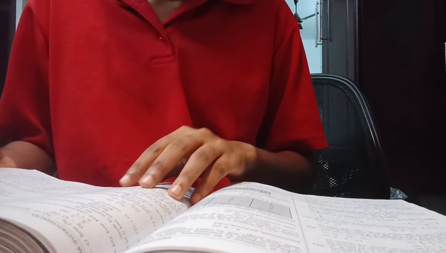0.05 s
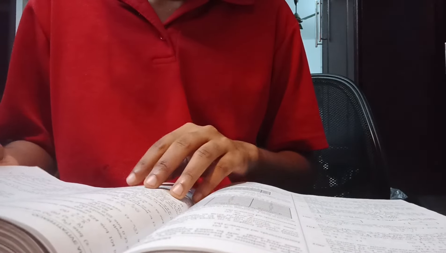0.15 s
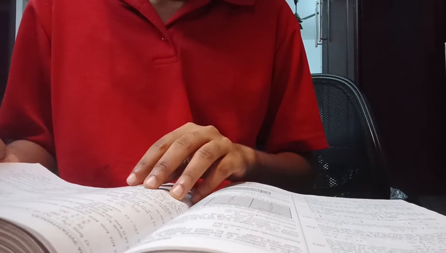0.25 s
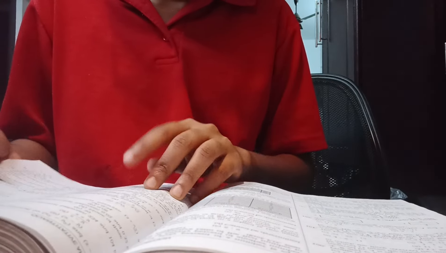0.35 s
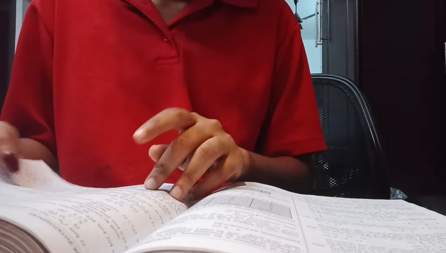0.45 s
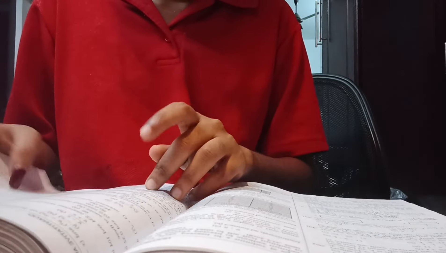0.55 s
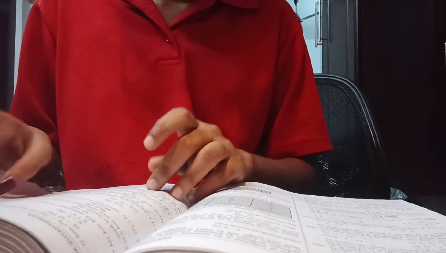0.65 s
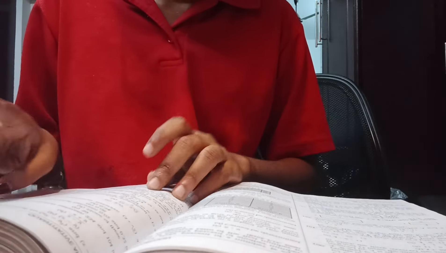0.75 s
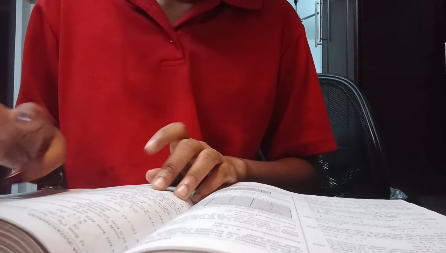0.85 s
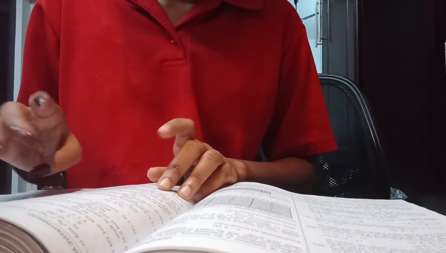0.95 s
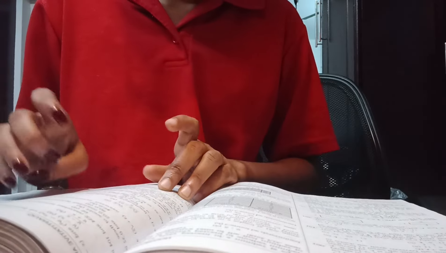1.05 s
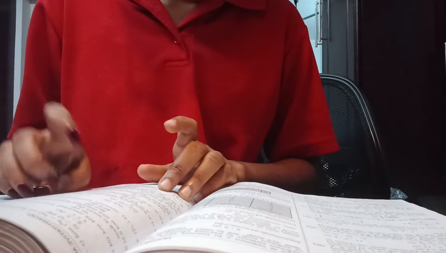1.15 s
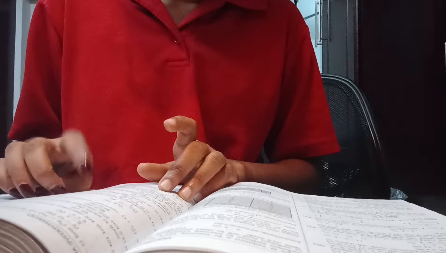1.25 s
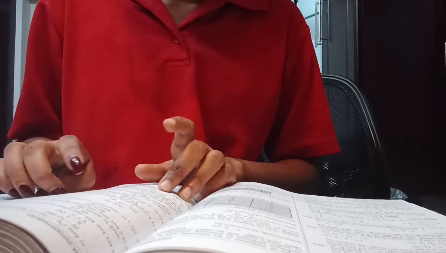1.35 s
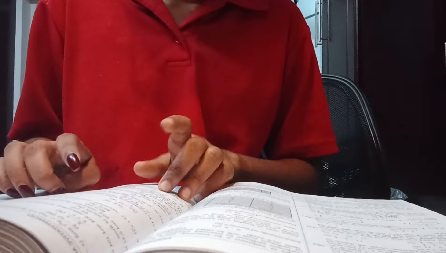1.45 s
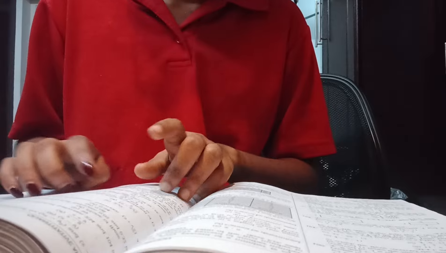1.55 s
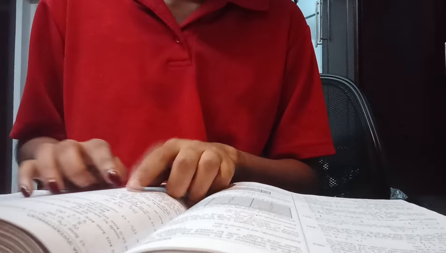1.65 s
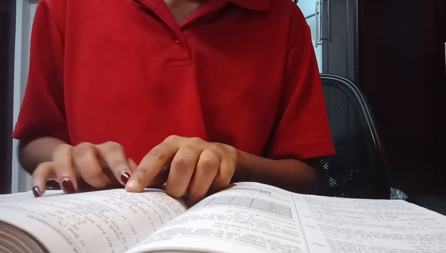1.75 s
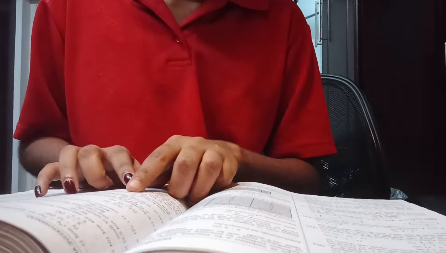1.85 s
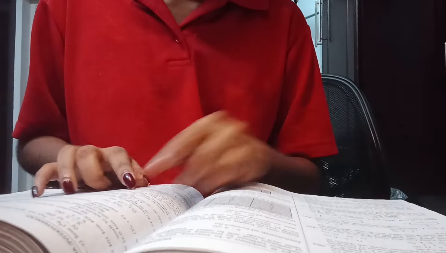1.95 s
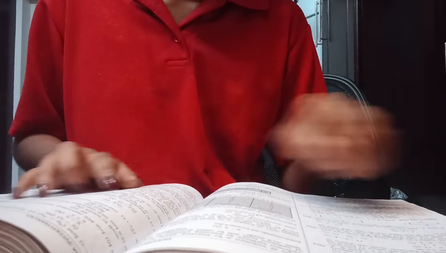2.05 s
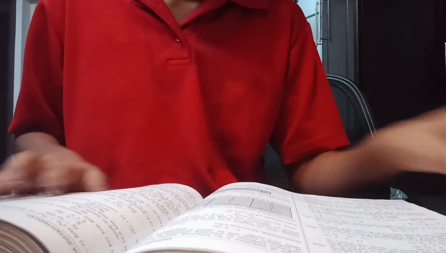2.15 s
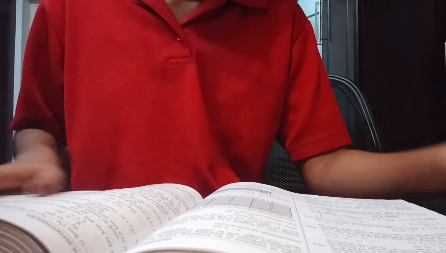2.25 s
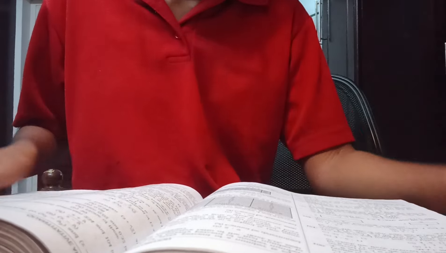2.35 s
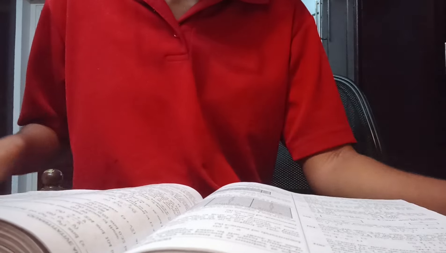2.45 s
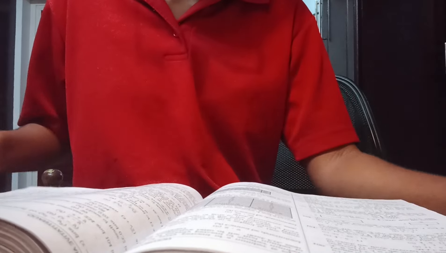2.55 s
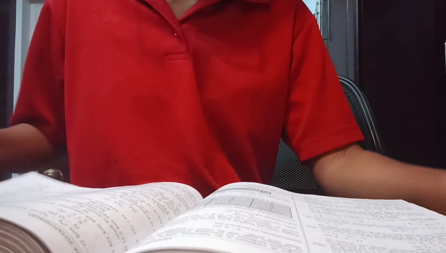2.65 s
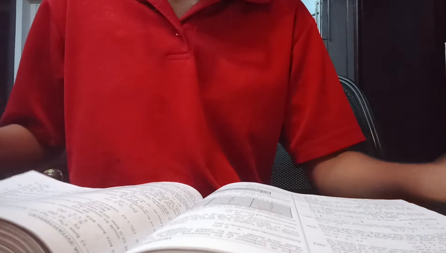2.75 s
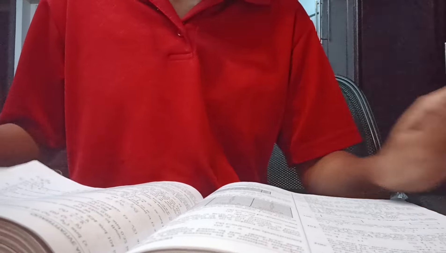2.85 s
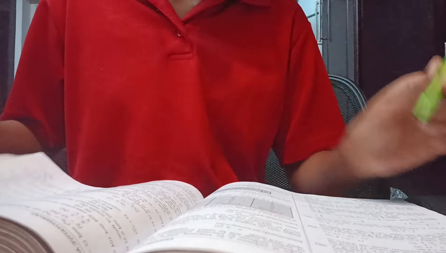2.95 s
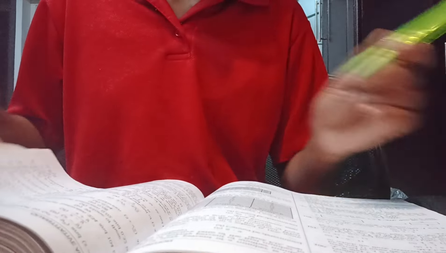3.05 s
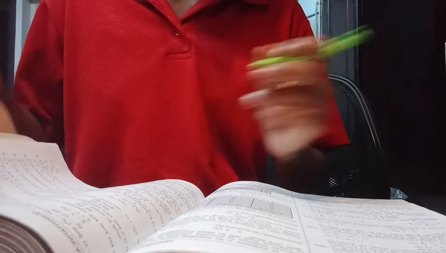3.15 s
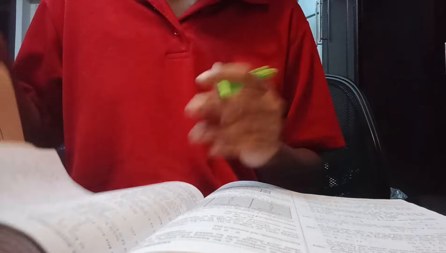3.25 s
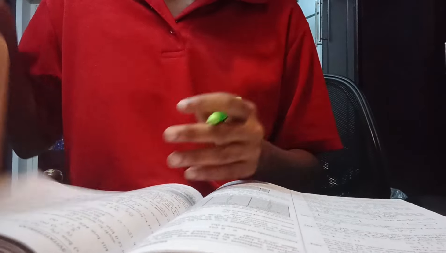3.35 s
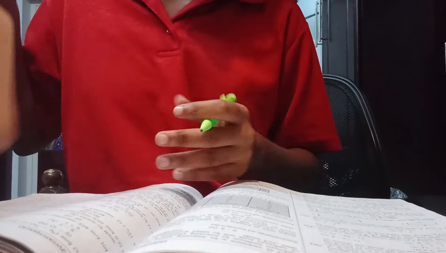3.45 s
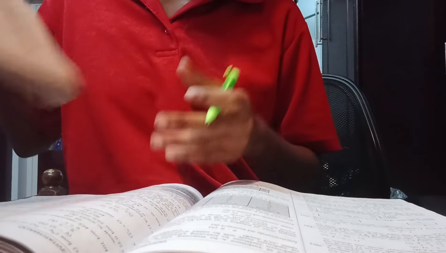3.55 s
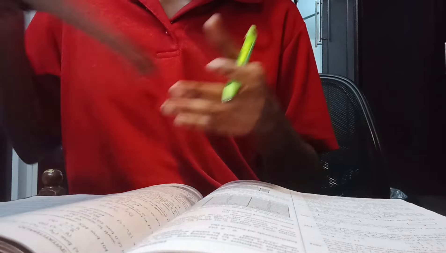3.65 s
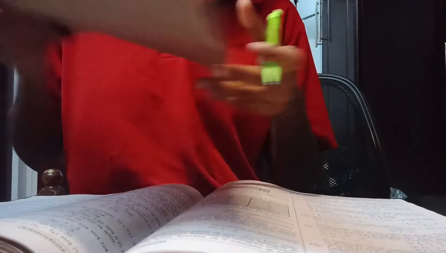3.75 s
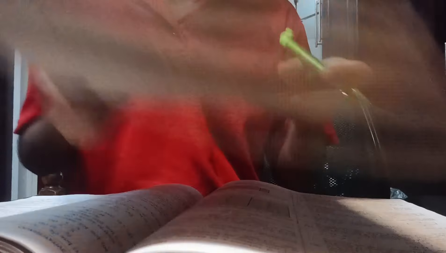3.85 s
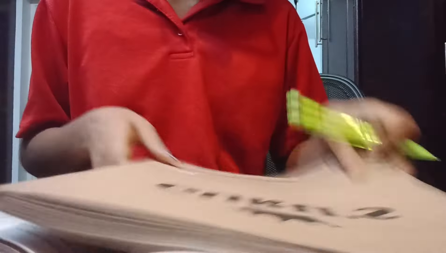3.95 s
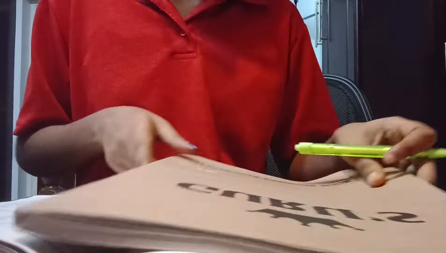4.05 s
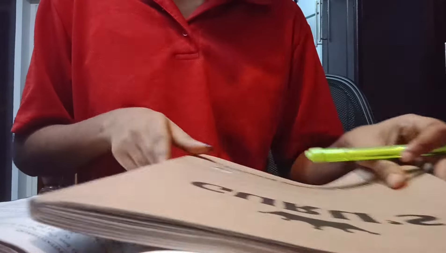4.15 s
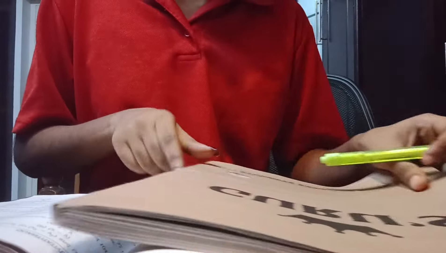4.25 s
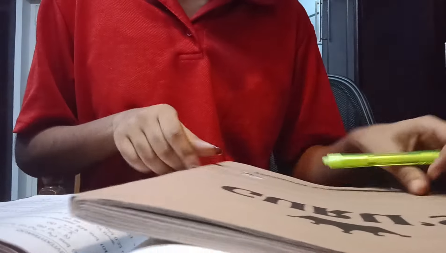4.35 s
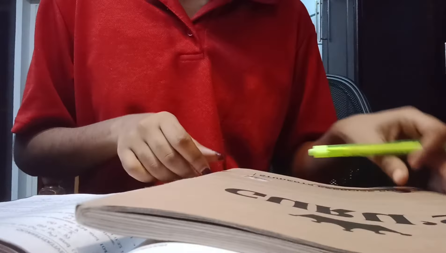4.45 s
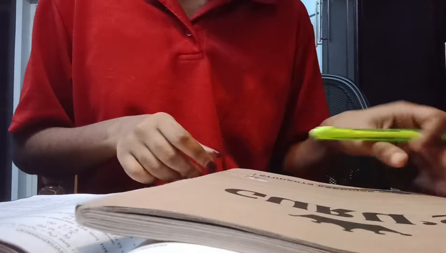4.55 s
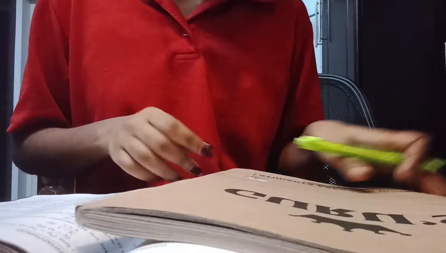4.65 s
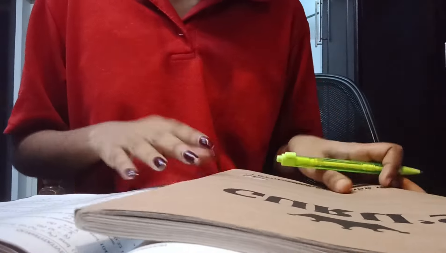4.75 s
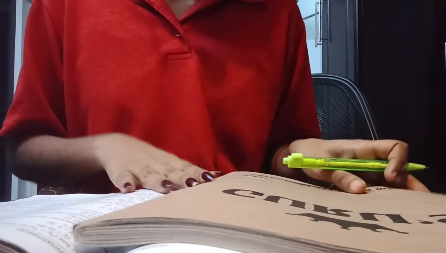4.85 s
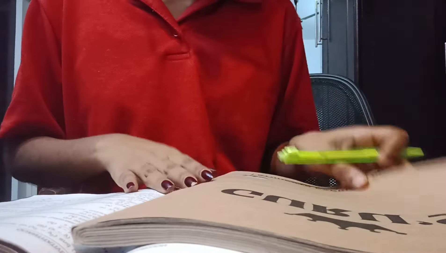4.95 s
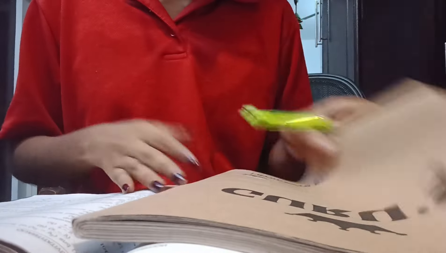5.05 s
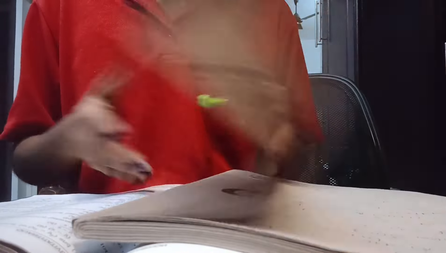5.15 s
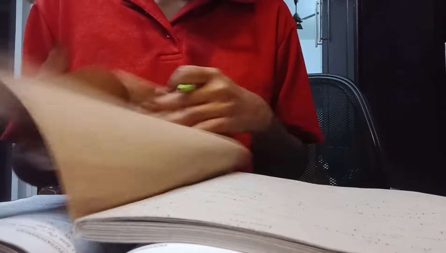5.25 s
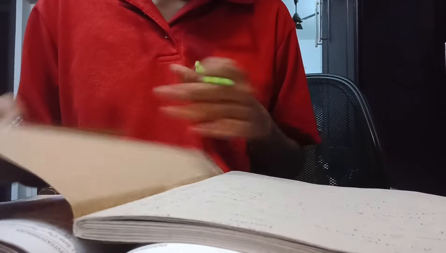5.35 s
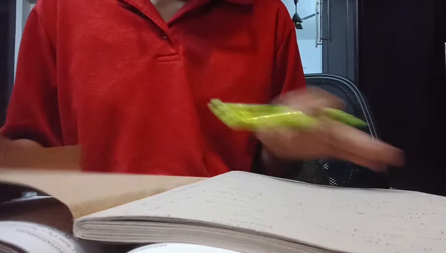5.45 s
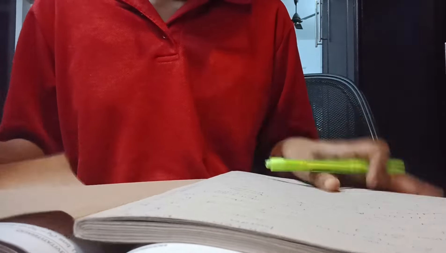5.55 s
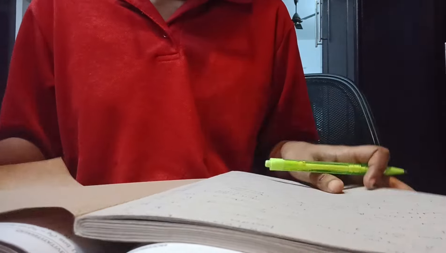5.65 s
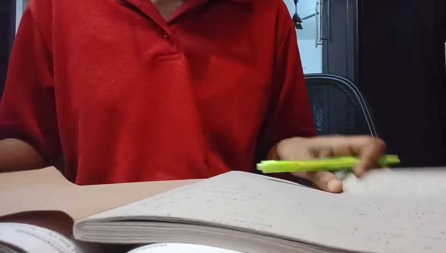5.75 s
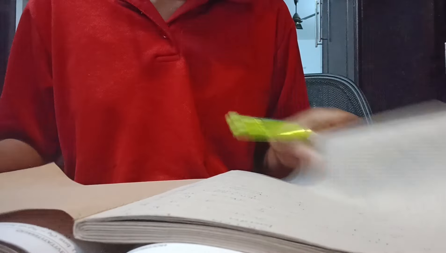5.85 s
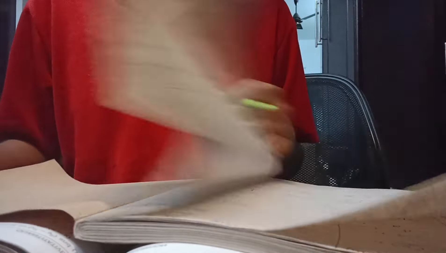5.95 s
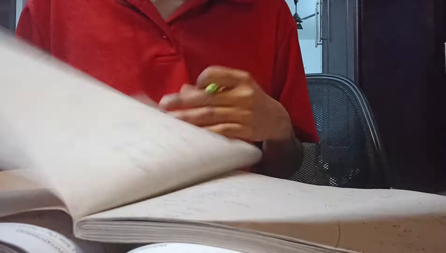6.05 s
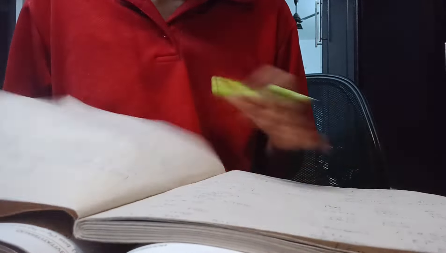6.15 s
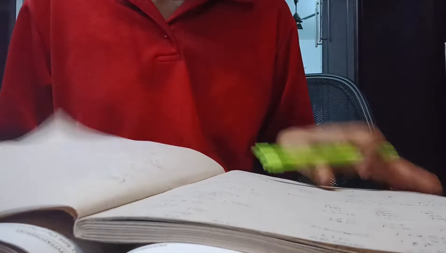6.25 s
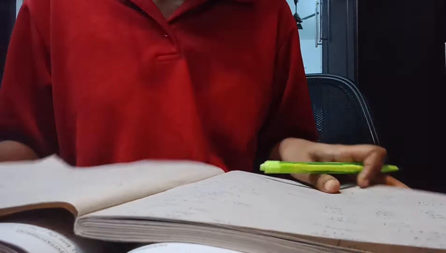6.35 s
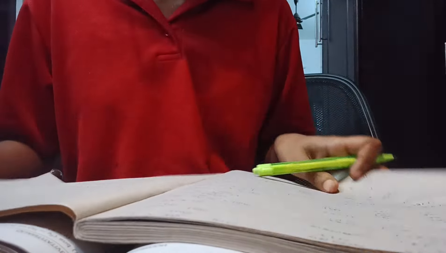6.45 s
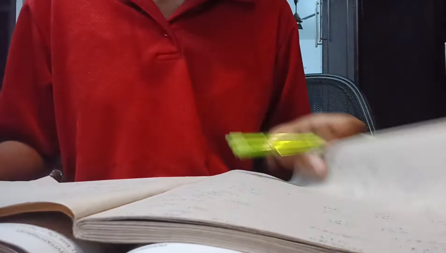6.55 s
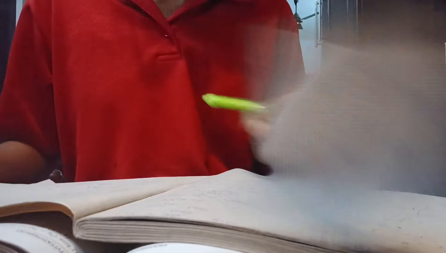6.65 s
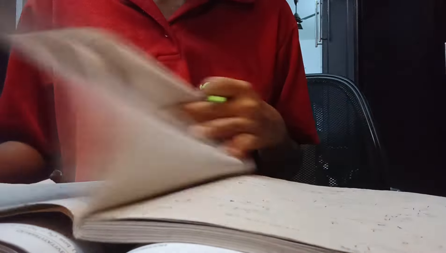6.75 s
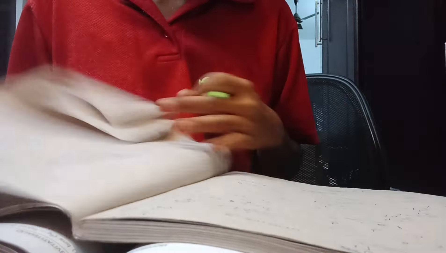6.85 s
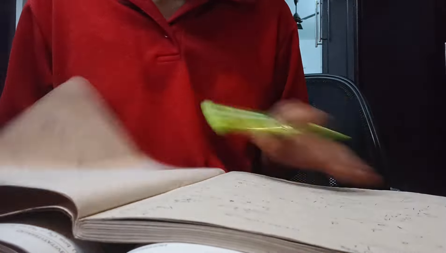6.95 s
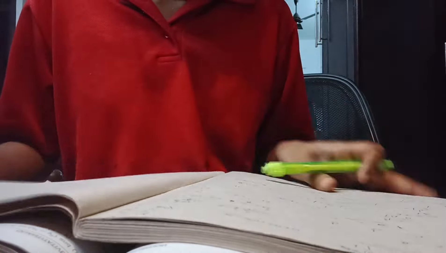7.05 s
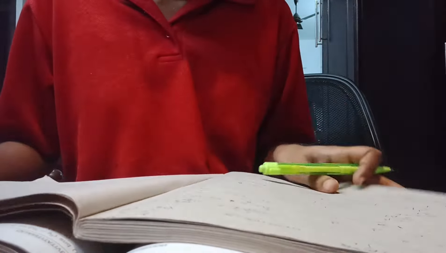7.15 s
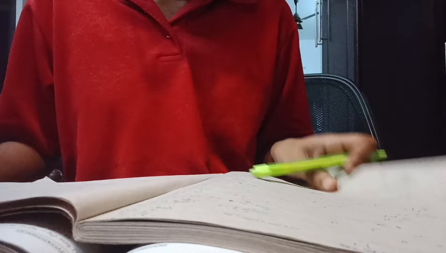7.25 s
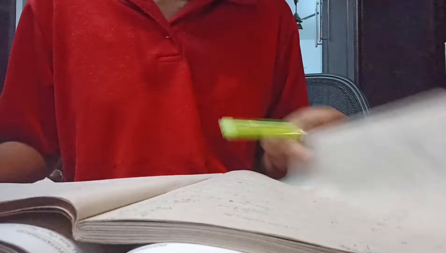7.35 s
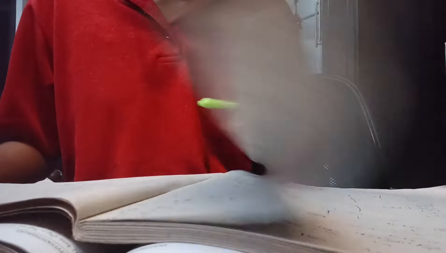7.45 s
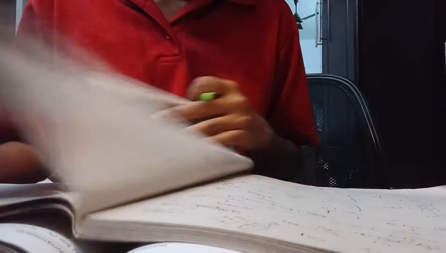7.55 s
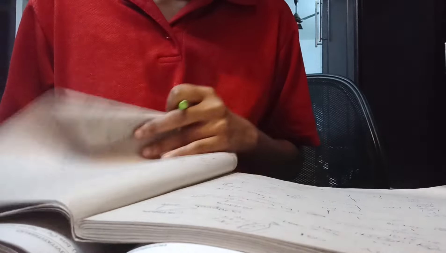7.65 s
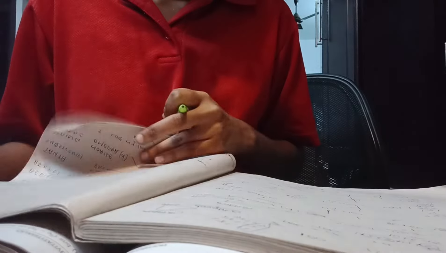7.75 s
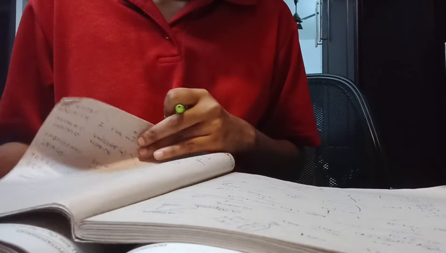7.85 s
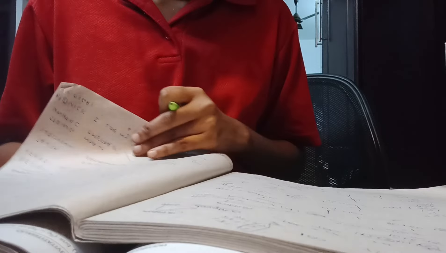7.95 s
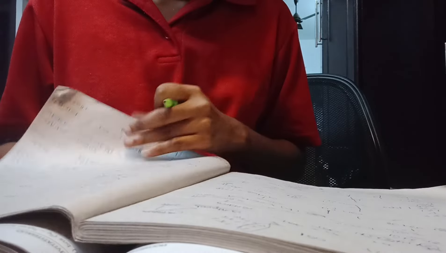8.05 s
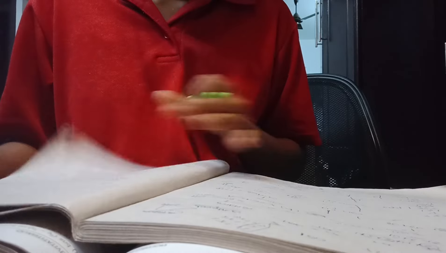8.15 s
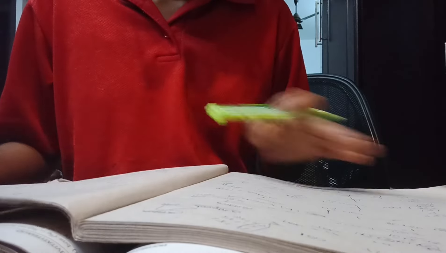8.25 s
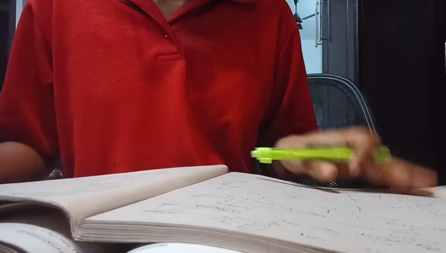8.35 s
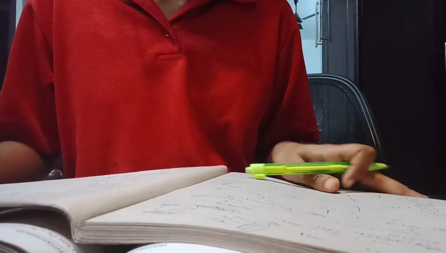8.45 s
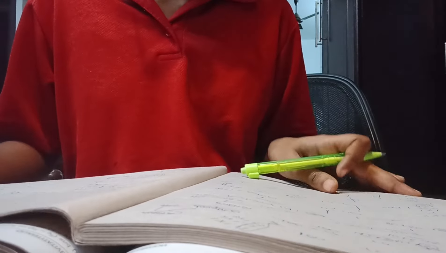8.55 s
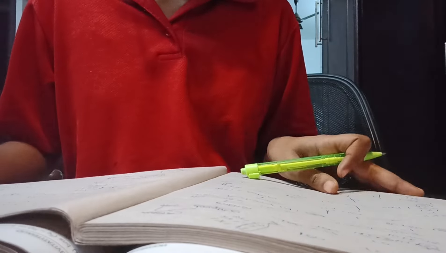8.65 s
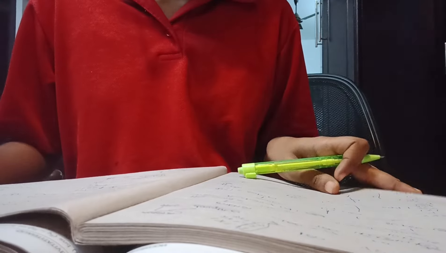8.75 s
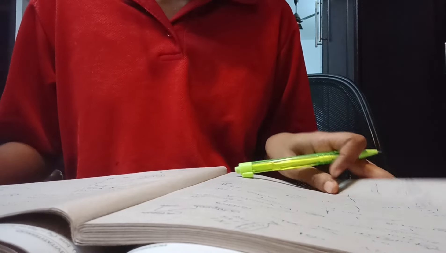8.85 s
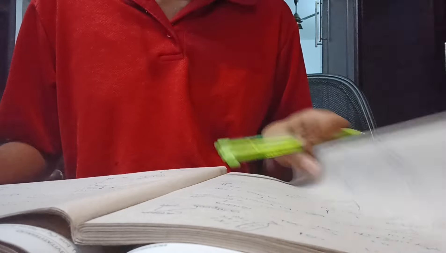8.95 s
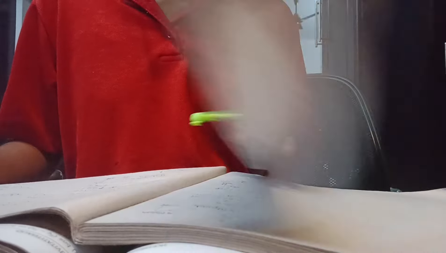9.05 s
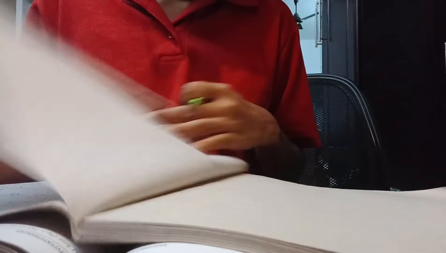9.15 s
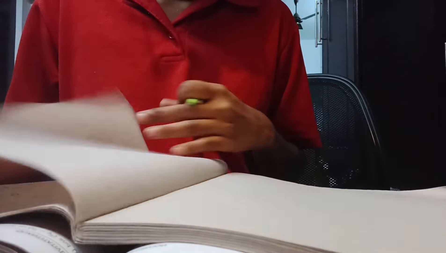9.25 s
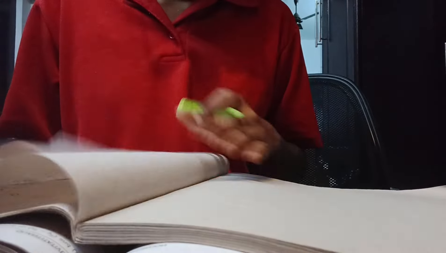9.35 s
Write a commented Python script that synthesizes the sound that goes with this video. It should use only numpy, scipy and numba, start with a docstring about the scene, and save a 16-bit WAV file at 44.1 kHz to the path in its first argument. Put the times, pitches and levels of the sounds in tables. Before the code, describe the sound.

Book and notebook pages are turned by hand with rustles, crisp crinkles and two thumps, over a faint fan hum.

```python
"""A fan hums and blows to the left in a small quiet room, and pages begin to slide softly.
Hands turn the leaves of a book and a notebook just in front of a phone with a microphone at each end.
The paper hisses by friction, crinkles and snaps as it buckles, and pushes air as it flaps.
The notebook knocks the desk, then lands on the book; each impact excites damped modes."""
import sys
import numpy as np
from scipy import signal
from scipy.fft import rfft, irfft
from scipy.io import wavfile
from scipy.ndimage import uniform_filter1d
from numba import njit

SR = 44100
rng = np.random.default_rng(int(sys.argv[2]) if len(sys.argv) > 2 else 0)


def inscribe(sig):
    """Save sig as 16-bit PCM at rate SR to the path in sys.argv[1].

    A 1-D sig is mono; a 2-D sig holds one channel per row.
    Samples are clipped to [-1, 1] before scaling.
    """
    pcm = np.round(np.clip(np.atleast_2d(sig).T, -1, 1) * 32767)
    wavfile.write(sys.argv[1], SR, pcm.astype(np.int16))


N = 414079
PORT_LAG = 20  # samples that sound needs from one microphone port to the other


def undb(db):
    """Amplitude ratio of a level in dB."""
    return np.exp(np.asarray(db) * (np.log(10) / 20))


def unit(x):
    """Normalisation to rms 1."""
    return x / np.sqrt(np.mean(x ** 2))


def butterworth(x, hz, kind):
    """Second-order Butterworth filter, low-pass or high-pass."""
    return signal.sosfilt(signal.butter(2, hz, kind, fs=SR, output="sos"), x)


def colour(x, spectrum):
    """Minimum-phase filter from rows of f/Hz, level/dB, built by folding the cepstrum."""
    hz, db = np.transpose(spectrum)
    log_hz = np.log(np.arange(2049) * SR / 4096 + 1)
    cepstrum = irfft(np.log(undb(np.interp(log_hz, np.log(hz), db))))
    cepstrum[1:2048] *= 2
    cepstrum[2049:] = 0
    response = irfft(np.exp(rfft(cepstrum)))[None, :2048]
    return signal.fftconvolve(x, response, axes=1)[:, :N]


def walk(rate, size=N):
    """Slow random modulation: values held for 1 / rate s and smoothed twice."""
    hold = int(SR / rate)
    steps = np.repeat(rng.standard_normal(size // hold + 1), hold)
    return uniform_filter1d(uniform_filter1d(steps, hold), hold)[:size]


def swells(start_s, db, swell_s, hold_s, fade_s):
    """Exponential rises and decays (s per 20 dB) about a hold; incoherent events add in power."""
    t = np.arange(0, N / SR + .001, .001)[:, None]
    drop_db = 20 * np.maximum(np.maximum((start_s - t) / swell_s, (t - start_s - hold_s) / fade_s), 0)
    gain = np.sqrt(np.sum(undb(db - drop_db) ** 2, axis=1)) + 1e-9
    return np.interp(np.arange(N) / SR, t[:, 0], gain)


def patchy(x, edges_hz, db, rate):
    """Independent amplitude modulation of each band keeps the timbre shifting."""
    out = 0
    for hz in edges_hz:
        band = butterworth(x, hz, "low")
        out = out + band * undb(db * walk(rate))
        x = x - band
    return out + x * undb(db * walk(rate))


@njit
def resonate(x, hz, width):
    """State-variable band-pass with a moving centre; width is 1 / Q."""
    y, band_state, low_state = np.empty(len(x)), 0., 0.
    for i in range(len(x)):
        g = np.tan(np.pi * hz[i] / SR)
        band = (band_state + g * (x[i] - low_state)) / (1 + g * (g + width))
        band_state = 2 * band - band_state
        low_state += 2 * g * band
        y[i] = width * band
    return y


def arrive(x, lag):
    """Path difference: the right port hears the sound lag samples after the left."""
    return np.array([x, np.roll(x, lag)])


def spread(draw, left_share, coherent_hz):
    """Partial coherence: noise comes from both sides; above coherent_hz each port hears its own."""
    from_left = np.sqrt(left_share) * arrive(draw(), PORT_LAG)
    from_right = np.sqrt(1 - left_share) * arrive(draw(), -PORT_LAG)
    low, high = (signal.butter(1, coherent_hz, kind, fs=SR) for kind in ("low", "high"))
    return signal.lfilter(*low, from_left + from_right) + signal.lfilter(*high, [draw(), draw()])


def hiss():
    """Gaussian white noise."""
    return rng.standard_normal(N)


def grains(rate, scatter_db):
    """Shot noise of fibres letting go: rate clicks a second, a few of them much larger."""
    out, count = np.zeros(N), int(rate * N / SR)
    sizes = rng.standard_normal(count) * undb(scatter_db * rng.exponential(size=count))
    out[rng.integers(0, N, count)] = sizes
    return out


def fan(shaft_hz=34.45, air_db=-56.5):
    """Rotor noise: wavering harmonics of the shaft rate over the broadband rush of turbulent air."""
    # tones of three blades and an eight-fold motor: multiple of the shaft rate, rms level/dB
    harmonics = [(3, -56), (6, -60.5), (8, -57.5), (9, -68), (12, -74.5), (15, -77), (18, -71), (21, -68),
                 (24, -70)]
    # rushing air: f/Hz, level/dB
    air_spectrum = [(18, -38), (30, -45), (90, -5.5), (121, -18), (153, -10.5), (273, -7), (355, -12),
                    (721, -13), (1130, -15), (1500, -23.5), (3300, -29), (4000, -36), (8520, -43.5),
                    (12300, -61), (16000, -52)]
    angle = 2 * np.pi * np.cumsum(shaft_hz * (1 + .003 * walk(1.996))) / SR
    tones = sum(np.sqrt(2) * undb(db + 2 * walk(11)) * np.sin(multiple * angle + 2 * np.pi * rng.random())
                for multiple, db in harmonics)
    rush = unit(colour(spread(hiss, .79, 3350), air_spectrum)) * undb(air_db + .44 * walk(3.08))
    return arrive(tones, PORT_LAG) + rush


def ring(blows, modes, waver_db=4.5):
    """Modal response to force pulses: longer contact excites the upper modes less."""
    force, t = np.zeros(N), np.arange(SR) / SR
    for s, db, contact_ms, *_ in blows:
        pulse = np.hanning(int(contact_ms * SR / 1000) + 2)
        at = int(s * SR)
        force[at:at + len(pulse)] += undb(db) * pulse / pulse.sum()
    rattle_db = waver_db * np.minimum(t / .03, 1)  # loose things make each mode waver
    response = sum(undb(db - 60 * t / t60 + rattle_db * walk(40, size=SR)) * np.cos(2 * np.pi * hz * t)
                   for hz, db, t60 in modes)
    return signal.fftconvolve(force, response)[:N]


def desk_knocks():
    """Plate vibration: the struck desk top rings from the left; being thin, it radiates little bass."""
    # blows on the desk: t/s, force level/dB, contact/ms
    blows = [(2.686, -43, 0.92), (3.449, -28, 1.4), (3.4725, -5.5, 1.64), (3.499, -19, 1.4),
             (4.46, -40.5, 5.), (5.15, -40, 3.8), (5.3, -36, 1.5), (5.4, -38, 5), (5.957, -33.5, 3.9),
             (9.077, -40, 1.8)]
    # modes of the desk top: f/Hz, level/dB, T60/s
    modes = [(102, -19, 0.12), (195.7, -14, 0.39), (214, 3.5, 0.055), (214, -20, 0.66), (231, -10, 0.48),
             (275, -19, 0.44), (306, -14, 0.21), (350, -15.5, 0.3), (434, -26, 0.24), (544, -23, 0.22),
             (596, -15, 0.14), (613, -7.5, 0.085), (740, -28, 0.098), (931, -23, 0.086)]
    return arrive(butterworth(ring(blows, modes), 125, "high"), PORT_LAG // 2)


def book_thumps(slap_t60=.05):
    """Damped impacts of notebook and hand on the book; the landing squeezes air from between sheets."""
    # the notebook lands and settles: t/s, force level/dB, contact/ms, slap level/dB
    landing = [(4.0021, -11, 2.44, -24), (4.0105, -21.5, 0.95, -28), (4.0165, -17.5, 0.59, -22.5),
               (4.027, -23, .9, -25.5), (4.037, -22, 4.5, -33), (4.05, -17, 3.6, -53),
               (4.066, -24, 2.9, -54), (4.093, -26, 2.9, -58)]
    # a hand comes down on the open book: t/s, force level/dB, contact/ms
    hand = [(1.776, -32, 7.)]
    # modes of the notebook on the book: f/Hz, level/dB, T60/s
    modes = [(102, -14, 0.6), (135.5, -14, 0.26), (172, -7.5, 0.12), (195.5, -6.5, 0.1),
             (249.4, -10.5, 0.14), (327, -12, 0.18), (395, -19.5, 0.11), (598, -8.5, .08), (848, -7, .05)]
    # expelled air: f/Hz, level/dB
    slap_spectrum = [(240, -47), (400, -11), (616, -0.5), (708, -5), (839, 1.5), (1050, -20), (1600, -11.5),
                     (3400, -23), (4510, -35), (16000, -40.5)]
    puffs = sum(undb(db - 60 * np.abs(t_s) / slap_t60) * (t_s > 0)
                for t_s, db in ((np.arange(N) / SR - s, db) for s, _, _, db in landing))
    slap = puffs * unit(colour(spread(hiss, .5, 1350), slap_spectrum))
    # the pad first draws air in as it bends, so its pressure starts downward
    return slap - arrive(ring(landing + hand, modes), 0)


def crease_snaps(ring_t60=.021, crack_t60=.022, spit_t60=.014, knock_t60=.011, knock_hz=583):
    """Snap-through buckling: a crack, a spit of treble, two ringing partials and a low knock."""
    # creases letting go: t/s, level/dB, f/Hz, left minus right/dB, relative spit level/dB
    creases = [(0.7961, -30.5, 2270, -2, -19), (0.8111, -30.5, 2410, 2, -10), (2.4497, -20, 1760, -10, -29),
               (2.4658, -27, 1890, -2.0, -24), (2.6846, -40, 1860, -3, -20), (2.7242, -33, 2310, -6, -27),
               (2.732, -31.5, 2000, -11, -27), (2.8115, -43, 2100, 5, -11), (3.4012, -33, 2750, 10, -7),
               (3.461, -32, 3100, 2.5, -2.5), (3.5064, -35, 2620, 5, -5), (4.5575, -40, 2690, -1.5, -12),
               (4.9297, -41, 2420, 1, -11), (5.155, -31, 2200, 3, -11), (5.2961, -15.5, 2150, -0.5, -17),
               (5.3295, -26.5, 1720, 4, -12), (5.3443, -30, 1720, -11, -12), (5.5149, -39, 2710, 0.0, -18),
               (5.9607, -30.5, 2410, 14, -9), (6.0137, -23, 2400, -2.0, -8),
               (6.0245, -17.5, 2490, -1.5, -12), (6.0523, -28, 1610, -2.0, -8),
               (6.077, -28.5, 1610, -15, -18), (6.119, -28, 1600, -1.0, -7), (6.2546, -44, 1730, 0, -10),
               (6.3579, -31.5, 2860, -1.5, -6), (6.5508, -38, 1720, -0.5, -14),
               (6.6782, -41, 2070, 1.5, -15), (6.693, -33, 2030, 6, -10), (6.7226, -35, 2280, 6, -16),
               (6.8064, -37, 2680, -3.5, -9), (6.8322, -33, 1710, -8, -9), (6.8887, -31.5, 1760, -7, -11),
               (6.9244, -34, 2420, -1.0, -6), (7.45, -36, 1980, 7, -19.5), (7.6008, -29, 1720, -11, -23),
               (7.653, -36, 2320, -4, -15), (7.8164, -37, 1450, -1, -15), (9.0129, -36.5, 2020, 0.5, -6),
               (9.08, -26, 2300, 7, -18), (9.1037, -32, 2330, 1.5, -11), (9.1411, -34, 2070, 3, -14),
               (9.191, -28.5, 2410, -6.0, -11), (9.1974, -36, 2840, -5, -7), (9.2406, -24, 1720, -5, -12),
               (9.2813, -26.5, 1780, -1, -13)]
    # crack: f/Hz, level/dB
    crack_spectrum = [(400, -19), (900, 2), (1800, -2), (2500, -3.5), (3500, -9), (5000, -25), (8000, -26)]
    # treble spit: f/Hz, level/dB
    spit_spectrum = [(2000, -17), (4500, 13), (7000, 7), (12000, -9.5)]
    out, t = np.zeros((2, N + 4096)), np.arange(2048) / SR
    noise = rng.standard_normal((len(creases), len(t)))
    cracks, spits = (unit(colour(noise, shape)[:, :len(t)]) for shape in (crack_spectrum, spit_spectrum))
    phases = rng.random((len(creases), 2)) * 2 * np.pi
    for (s, db, hz, pan_db, spit_db), phase, crack, spit in zip(creases, phases, cracks, spits):
        tone = undb(-6) * np.sin(2 * np.pi * hz * t + phase[0])
        tone += undb(-9) * np.sin(2 * np.pi * 1.33 * hz * t + phase[1])
        snap = tone * undb(-60 * t / ring_t60)
        snap += crack * undb(-9 - 60 * t / crack_t60)
        snap += spit * undb(spit_db - 60 * t / spit_t60)
        snap += np.sin(2 * np.pi * knock_hz * t) * undb(-12 - 60 * t / knock_t60)
        # the nearer port hears it louder and sooner
        for side, sign in enumerate((1, -1)):
            at = int(s * SR) + (PORT_LAG if sign * pan_db < 0 else 0)
            out[side, at:at + len(t)] += undb(db + sign * pan_db / 2) * snap
    return out[:, :N]


def flapping(motion):
    """Air displacement: flapping and sliding sheets radiate low noise and blow wind on the ports."""
    # whole sheets flap: t/s, level/dB, fade/s per 20 dB
    flaps = [(0.806, -56.0, 0.132), (1.25, -57.0, 0.04), (1.766, -52.5, 0.046), (2.406, -49.0, 0.04),
             (2.457, -44.5, 0.08), (2.541, -51.5, 0.197), (2.694, -49.0, 0.125), (2.911, -55.5, 0.121),
             (3.008, -59.0, 0.397), (3.45, -46.5, 0.06), (4.2, -56.5, 0.3), (4.463, -55.0, 0.071),
             (5.167, -50.0, 0.124), (5.245, -51.0, 0.04), (5.33, -42.0, 0.117), (5.358, -47.5, 0.04),
             (5.395, -40.0, 0.102), (5.505, -49.5, 0.193), (5.64, -51.5, 0.25), (5.971, -46.0, 0.04),
             (6.03, -44.0, 0.31), (6.121, -39.0, 0.064), (6.27, -58.0, 0.502), (6.687, -56.0, 0.6),
             (6.849, -46.0, 0.065), (6.878, -46.0, 0.164), (7.46, -52.0, 0.203), (7.6, -48.0, 0.212),
             (7.705, -46.5, 0.122), (7.821, -57.0, 0.599), (8.501, -58.0, 0.124), (9.086, -50.5, 0.275),
             (9.237, -40.5, 0.15), (9.284, -49.0, 0.041)]
    # flapping sheet: f/Hz, level/dB
    flap_spectrum = [(50, -27), (110, -7), (250, 4), (400, 3), (630, 3), (850, 3), (1100, -27),
                     (1600, -36.5)]
    # wind on the ports: f/Hz, level/dB
    gust_spectrum = [(20, -17), (70, 2), (130, 5.5), (220, -29.5)]
    flap = colour(spread(lambda: grains(1500, 1.26), .81, 710), flap_spectrum) * undb(2.15 * walk(30))
    gust = colour(spread(hiss, .32, 70), gust_spectrum) * undb(5.1 * walk(11))
    s, db, fade_s = np.transpose(flaps)
    pushing = np.hypot(swells(s, db, swell_s=.04, hold_s=0, fade_s=fade_s), undb(-13) * motion)
    return (undb(4.5) * unit(flap) + undb(-4.5) * unit(gust)) * pushing


def crinkling(motion, width=.75, wander=.14):
    """Local buckling: flurries of clicks excite a bent sheet's resonance; sliding crinkles faintly."""
    # a sheet bends: t/s, level/dB, swell/s per 20 dB, fade/s per 20 dB, resonance f/Hz
    bends = [(0.71, -45, 0.05, 0.16, 2550), (0.812, -44, 0.03, 0.045, 2600),
             (1.738, -55, 0.053, 0.088, 1700), (2.321, -56, 0.008, 0.067, 2500),
             (2.452, -39, 0.008, 0.06, 1850), (2.55, -38, 0.04, 0.045, 1900), (2.65, -59, 0.2, 0.2, 1800),
             (2.735, -48, 0.04, 0.04, 2050), (2.924, -60, 0.125, 0.02, 1600),
             (3.476, -38, 0.008, 0.05, 1700), (3.545, -56, 0.11, 0.196, 1700), (4.0, -47, 0.05, 0.02, 1600),
             (4.105, -53, 0.167, 0.238, 1600), (4.425, -61, 0.4, 0.39, 1900),
             (4.557, -55, 0.025, 0.026, 2100), (4.809, -58, 0.045, 0.093, 2100),
             (5.01, -52, 0.06, 0.2, 3000), (5.155, -39, 0.02, 0.04, 2200), (5.245, -48, 0.03, 0.07, 2000),
             (5.301, -33, 0.004, 0.027, 2300), (5.331, -39, 0.026, 0.066, 2400),
             (5.392, -41, 0.072, 0.084, 2200), (5.523, -52, 0.015, 0.12, 2400),
             (5.956, -43, 0.009, 0.35, 2200), (6.026, -32, 0.057, 0.118, 2450),
             (6.112, -41, 0.012, 0.075, 2300), (6.26, -50, 0.026, 0.021, 1700),
             (6.33, -54, 0.1, 0.05, 3000), (6.555, -51, 0.05, 0.06, 2200), (6.69, -48, 0.032, 0.25, 2050),
             (6.826, -43, 0.035, 0.172, 2000), (6.908, -40, 0.096, 0.033, 1900),
             (7.452, -43, 0.006, 0.079, 2000), (7.613, -46, 0.155, 0.139, 1750),
             (7.646, -50, 0.009, 0.325, 2350), (7.762, -49, 0.214, 0.035, 1800),
             (7.821, -50, 0.041, 0.048, 1550), (8.995, -55, 0.247, 0.02, 2900),
             (9.075, -47, 0.008, 0.167, 2600), (9.2, -45, 0.011, 0.025, 2400),
             (9.246, -38.5, 0.032, 0.063, 1900), (9.281, -42, 0.008, 0.104, 2600)]
    # crinkle: f/Hz, level/dB
    spectrum = [(700, -10), (1300, -2), (1800, -2.5), (2400, -4.5), (3400, -5.5), (3900, -12),
                (6000, -20.5), (9000, -41)]
    clicks = spread(lambda: grains(3500, 1.7), .39, 2200)
    crinkle = unit(colour(clicks, spectrum) * undb(2.5 * walk(90)))
    s, db, swell_s, fade_s, hz = np.transpose(bends)
    bending = swells(s, db, swell_s, 0, fade_s)
    # the loudest bend sets the resonance, which wanders as the sheet changes shape
    centre_hz = swells(s, db + 20 * np.log10(hz), swell_s, 0, fade_s) / bending
    centre_hz *= np.exp(wander * walk(50))
    resonant = unit(np.array([resonate(resonate(port, centre_hz, width), centre_hz, 2 * width)
                              for port in crinkle]))
    return (undb(-8) * resonant + undb(-5.5) * crinkle) * bending + undb(-8) * crinkle * motion


def turning_pages():
    """Sliding friction: sheet on sheet hisses and ticks; the same motion crinkles it and moves air."""
    # strokes: full level at t/s, level/dB, swell/s per 20 dB, hold/s, fade/s per 20 dB, top octave/dB
    strokes = [(0.123, -68.0, 0.065, 0.046, 0.254, 4.0), (0.488, -73.5, 0.179, 0.015, 0.052, 6.0),
               (0.718, -53.0, 0.148, 0.028, 0.086, 3.5), (0.803, -50.5, 0.057, 0.01, 0.094, 0.5),
               (0.96, -65.0, 0.3, 0.008, 0.204, 3.0), (1.245, -72.0, 0.03, 0.004, 0.489, 4.5),
               (1.495, -71.0, 0.244, 0.004, 0.244, 2.0), (1.725, -56.0, 0.05, 0.03, 0.2, 1.0),
               (2.02, -60.5, 0.04, 0.015, 0.476, 5.5), (2.25, -52.0, 0.19, 0.099, 0.403, 5.5),
               (2.585, -60.0, 0.129, 0.023, 0.018, 1.5), (2.743, -64.5, 0.17, 0.008, 0.019, 2.5),
               (2.895, -60.5, 0.302, 0.03, 0.23, 6.0), (3.229, -53.0, 0.108, 0.122, 0.069, 6.5),
               (3.4, -41.5, 0.2, 0.067, 0.077, 9), (3.507, -43.0, 0.012, 0.003, 0.012, 4.0),
               (3.517, -53.0, 0.02, 0.003, 0.16, 2.0), (3.903, -64.0, 0.039, 0.134, 0.445, 5.5),
               (4.012, -44.5, 0.048, 0.002, 0.129, 1.0), (4.235, -67.0, 0.362, 0.057, 0.459, 2.0),
               (4.445, -60.5, 0.493, 0.028, 0.317, 1.5), (4.555, -54.0, 0.019, 0.004, 0.12, 0.5),
               (4.75, -60.5, 0.015, 0.035, 0.237, -2.5), (4.933, -60.5, 0.031, 0.005, 0.015, 4.0),
               (5.03, -49, 0.089, 0.09, 0.2, -2), (5.159, -46.5, 0.117, 0.005, 0.021, -0.5),
               (5.227, -52.5, 0.016, 0.016, 0.019, -8.0), (5.337, -42.5, 0.092, 0.056, 0.113, -2.5),
               (5.514, -46.5, 0.221, 0.008, 0.182, 2.5), (5.803, -51.5, 0.04, 0.061, 0.168, -8.5),
               (5.899, -42.5, 0.103, 0.076, 0.223, -0.5), (6.017, -37.5, 0.027, 0.006, 0.117, -3.0),
               (6.114, -41.5, 0.01, 0.005, 0.083, -4.5), (6.261, -47.5, 0.01, 0.008, 0.157, 0.5),
               (6.357, -48.0, 0.113, 0.004, 0.057, 2.0), (6.59, -46.0, 0.171, 0.059, 0.117, -0.5),
               (6.698, -49.5, 0.113, 0.031, 0.068, -6.0), (6.894, -46.5, 0.218, 0.018, 0.108, -1.5),
               (7.105, -58.0, 0.016, 0.063, 0.05, -2.0), (7.289, -51.5, 0.059, 0.12, 0.14, -1.0),
               (7.439, -53.5, 0.16, 0.007, 0.165, 2.0), (7.6, -52.5, 0.408, 0.059, 0.176, 0.5),
               (7.732, -47, 0.012, 0.04, 0.102, 6), (7.803, -64.5, 0.007, 0.004, 0.49, 2.0),
               (8.141, -59.5, 0.09, 0.008, 0.086, 3.0), (8.296, -68.5, 0.116, 0.011, 0.174, 8.0),
               (8.594, -57.5, 0.154, 0.005, 0.175, 4.5), (8.892, -59.0, 0.035, 0.047, 0.024, -5.5),
               (9.009, -42.5, 0.1, 0.047, 0.164, -2.0), (9.191, -40.5, 0.006, 0.003, 0.018, -9.0),
               (9.242, -43.0, 0.029, 0.045, 0.055, -3.0), (9.354, -56.5, 0.212, 0.025, 0.2, -7.0)]
    # friction noise: f/Hz, level/dB
    spectrum = [(800, -41), (2500, 2.5), (4000, -0.5), (6500, 1.5), (7300, -2), (11000, -5.5),
                (13000, -4.5), (16000, -11)]
    roughness = spread(lambda: hiss() + undb(12) * grains(200, 2), 1, 1300)
    friction = unit(colour(roughness, spectrum)) * undb(1.5 * walk(60))
    friction = patchy(friction, (3500, 7000, 11000), db=1.2, rate=45)
    s, db, swell_s, hold_s, fade_s, top_db = np.transpose(strokes)
    motion = swells(s, db, swell_s, hold_s, fade_s)
    top_gain = swells(s, db + top_db, swell_s, hold_s, fade_s)
    sliding = motion * friction + (top_gain - motion) * butterworth(friction, 9700, "high")
    return sliding + crinkling(motion) + flapping(motion)


def reverberation(x, t60=.42):
    """Diffuse field: reflections from the walls form an exponentially decaying noise tail."""
    t = np.arange(SR // 2) / SR
    tail = rng.standard_normal((2, len(t))) * undb(-60 * t / t60) * (t > .004)
    tail = colour(tail, [(150, -10.5), (600, -1), (3000, -2.5), (9000, 0)])[:, :len(t)]
    return signal.fftconvolve(x, tail / np.sqrt(np.sum(tail ** 2) / 2), axes=1)[:, :N]


def scene():
    """Superposition of the impacts and their reverberation, the turning pages and the fan."""
    impacts = crease_snaps() + book_thumps() + desk_knocks()
    return impacts + undb(-7) * reverberation(impacts) + turning_pages() + fan()


def record(dry):
    """Cavity resonance lifts the left port's top octave; the phone limits the band and rounds peaks."""
    left = colour(dry[:1], [(8500, 0), (10000, 5), (12500, 11), (14500, 5.5), (16000, 13)])
    ports = butterworth(np.vstack([left, dry[1:]]), 75, "high")
    self_noise = undb(-53) * signal.lfilter(*signal.butter(1, 45, fs=SR), rng.standard_normal((2, N)))
    rounded = 1.4 * np.tanh((ports + self_noise) / 1.4)
    return signal.sosfilt(signal.ellip(14, .3, 80, 15820, fs=SR, output="sos"), rounded)


dry = scene()
out = record(dry)
inscribe(out)
```